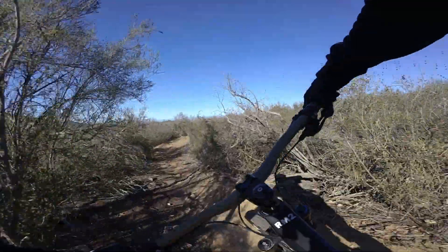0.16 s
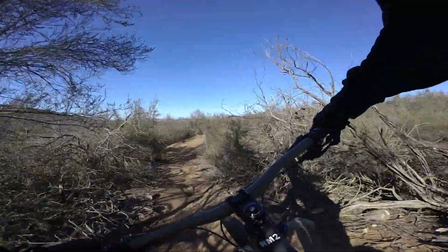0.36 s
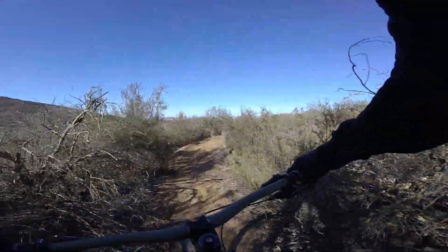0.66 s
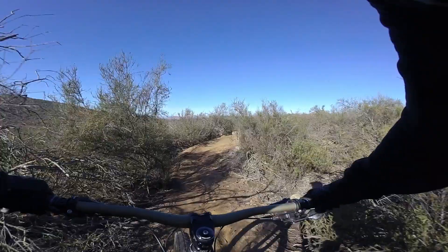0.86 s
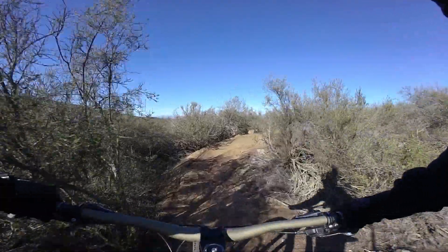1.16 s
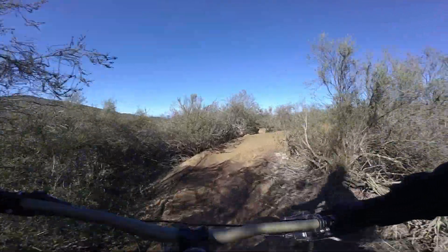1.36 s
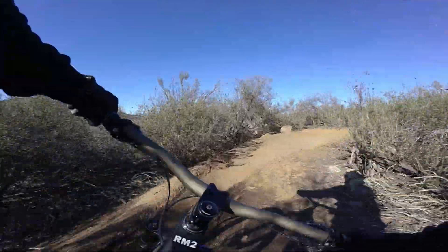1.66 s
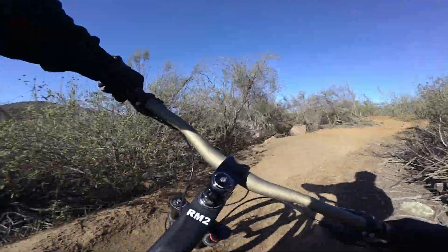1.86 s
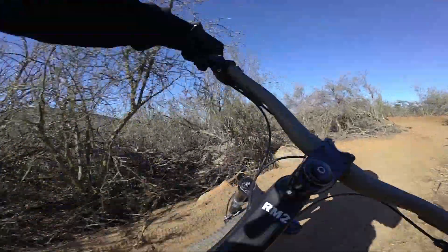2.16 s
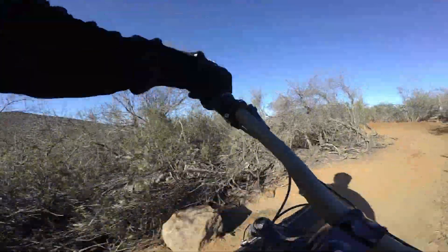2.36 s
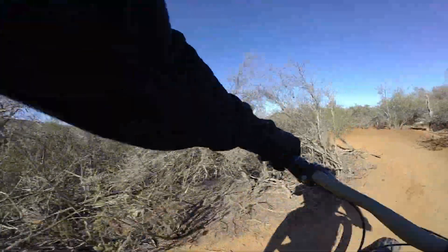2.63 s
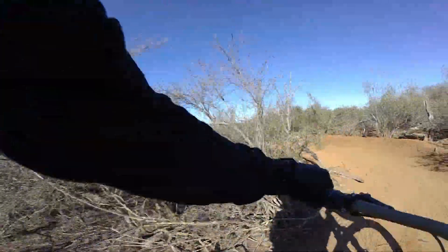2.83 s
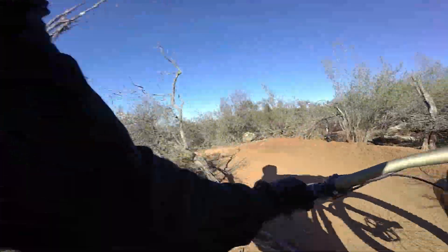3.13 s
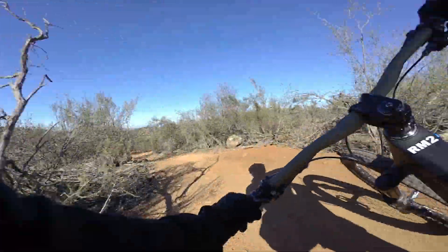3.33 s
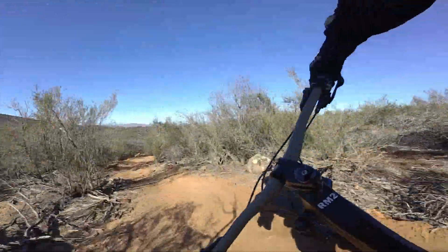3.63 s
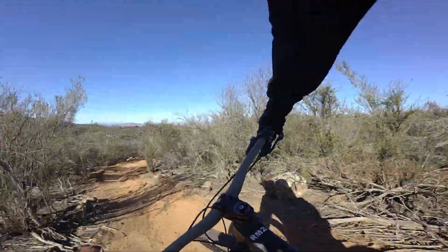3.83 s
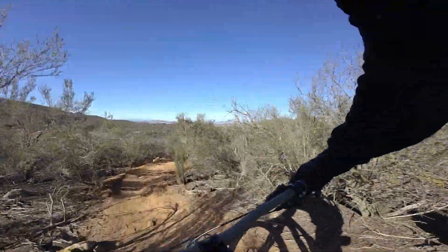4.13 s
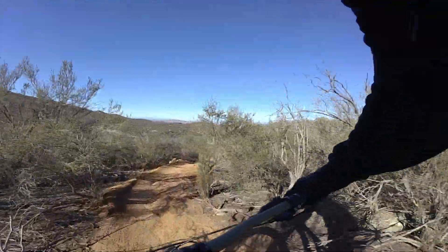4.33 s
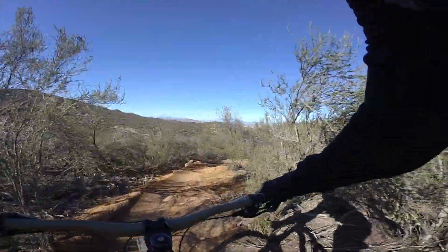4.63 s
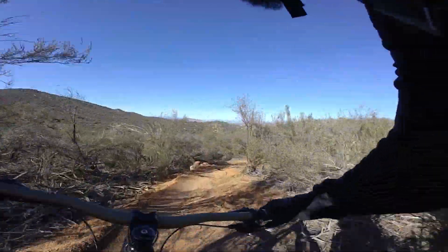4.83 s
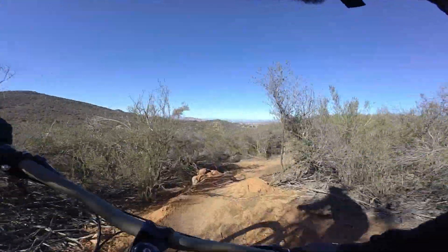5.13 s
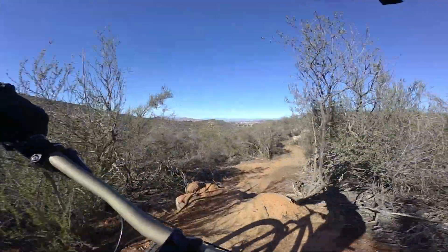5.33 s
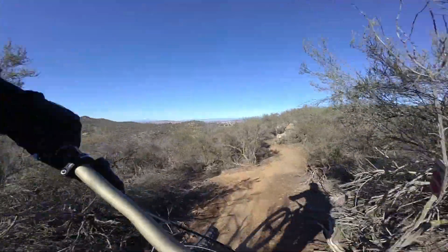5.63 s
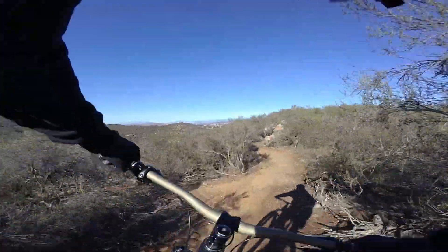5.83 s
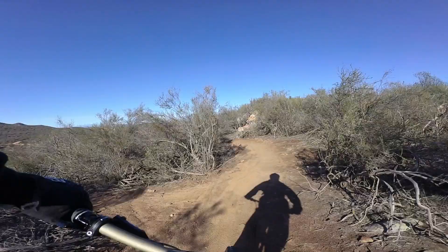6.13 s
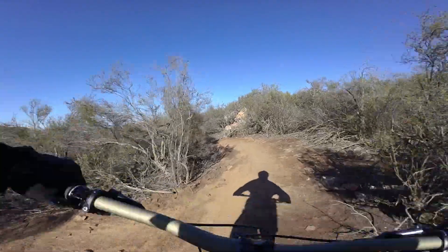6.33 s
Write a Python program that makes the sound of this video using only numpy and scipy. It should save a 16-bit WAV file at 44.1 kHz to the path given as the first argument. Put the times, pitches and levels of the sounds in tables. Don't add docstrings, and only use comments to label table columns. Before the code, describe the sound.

A mountain bike coasts on dirt and rock, heard by a small chest microphone in open air. Throughout, the tyres hum low and crunch grit while the freehub buzzes with uneven metallic clicks, roughly 50 to 115 teeth per second. From 0.2 to 1 s, wind flutters and thumps hard, with a pop near 0.5 and frame clacks near 0.8. Dry twigs hiss past at 1.0-1.25 s. Wind eases; from 1.45 to 2.45 s a faint blurred tread tone rises, then falls. The ratchet falls silent about 2.3-2.8 s during a pedal stroke, with chain rattle and small knocks, then resumes. From 3.3 to 4.9 s hard gusts, puffs and clipped pops mask the bike, strongest around 4 s. More blasts hit at 5.4-5.75 s as the tyres lighten. At 6.1 s they land with a boom, clattering frame and chain slaps, then coasting continues until 6.5 s.

```python
import sys
import numpy as np
from scipy import signal
from scipy.io import wavfile
from scipy.ndimage import uniform_filter1d

SR = 44100
rng = np.random.default_rng(int(sys.argv[2]) if len(sys.argv) > 2 else 0)


def transcribe(signal):
    frames = np.atleast_2d(signal).T
    limited = np.clip(frames, -1, 1)
    pcm = np.round(limited * 32767).astype(np.int16)
    wavfile.write(sys.argv[1], SR, pcm)


def volts_from_decibels(level):
    exponent = np.asarray(level, float) / 20
    return 10 ** exponent


N = 285768


def unit(x):
    return x / np.sqrt(np.mean(x ** 2) + 1e-20)


def in_time(rows):
    s, *columns = np.transpose(rows)
    return [np.interp(np.arange(N) / SR, s, c) for c in columns]


def band(x, lo_hz, hi_hz, order=2):
    limits = [lo_hz, min(hi_hz, .45 * SR)]
    return signal.sosfilt(signal.butter(order, limits, "band", fs=SR, output="sos"), x)


def drift(rate):
    r = np.exp(-20 * np.pi * rate / SR)
    slow = signal.lfilter([1], [1, -2 * r, r * r], rng.standard_normal(N // 10 + 4002))[4000:]
    return np.interp(np.arange(N) / 10, np.arange(len(slow)), unit(slow - slow.mean()))


def ring(x, hz, t60):
    r, w = volts_from_decibels(-60 / (t60 * SR)), 2 * np.pi * hz / SR
    return signal.lfilter([0, np.sin(w)], [1, -2 * r * np.cos(w), r * r], x + 1e-18)


def colour(x, spectrum, patchy_db):
    hz, level_db = np.transpose(spectrum)
    centres = 500 * 2 ** np.arange(0, 5.1, 1 / 3)
    bands_db = np.interp(np.log(centres), np.log(hz), level_db)
    total, sign = 0, 1
    for centre, db in zip(centres, bands_db):
        swell = volts_from_decibels(db + patchy_db * drift(6.7))
        total = total + swell * sign * band(x, centre / 1.12, centre * 1.12)
        sign = -sign
    return unit(total)


def bursts(rows, rise_db_s, sag_db, fall_db_s):
    start, length, level_db, value = np.transpose(rows)[:, :, None]
    t = np.arange(0, N + 20, 20) / SR
    done = np.clip((t - start) / length, 0, 1)
    early, late = np.maximum(start - t, 0), np.maximum(t - start - length, 0)
    shape = level_db - sag_db * done - rise_db_s * early - fall_db_s * late
    lead, steps = np.argmax(shape, axis=0), np.arange(len(t))
    columns = np.maximum(shape[lead, steps], -90), value[lead, 0], done[lead, steps]
    return [np.interp(np.arange(N) / SR, t, c) for c in columns]


def pushes(rows, swing):
    out = np.zeros(N)
    for s, peak_db, hz in rows:
        u = np.linspace(-3, 3, int(2 * SR / hz))
        push = volts_from_decibels(peak_db) * np.cos(swing * u) * np.exp(-u ** 2 / 2)
        i = int(s * SR)
        out[i:i + len(u)] += push[:N - i]
    return out


# time in seconds, peak in dB, pitch in Hz.
JOLTS = [(1.169, -27, 70.4), (1.399, -36, 70), (1.541, -21.5, 69.8), (2.263, -20.5, 68.5),
         (2.628, -18.5, 70.5), (2.709, -32, 70), (3.01, -32, 70), (5.987, -24, 73), (6.4, -22, 71)]


def bumps():
    return pushes(JOLTS, swing=1.66)


def mount_shake():
    start_db, t60 = -11, 0.34
    s, peak_db, _ = np.transpose(JOLTS)[:, :, None]
    since = np.arange(N) / SR - s
    return np.sum((since > 0) * volts_from_decibels(peak_db + start_db - 60 * np.abs(since) / t60), axis=0)


# time in seconds, level in dB.
HEADWIND_LEVEL = [(0.0, -34.5), (0.25, -19.5), (0.56, -31), (0.87, -24), (1.43, -38.5), (1.93, -61),
                  (2.83, -46), (3.32, -36.5), (3.45, -31), (3.54, -14.5), (3.62, -28.5), (4.15, -25),
                  (4.48, -29.5), (4.69, -20), (5.09, -33.5), (5.54, -16), (5.83, -36), (6.48, -36.5)]


def headwind():
    swings = unit(band(rng.standard_normal(N), 40, 129) * volts_from_decibels(2.64 * drift(4.6)))
    return (volts_from_decibels(in_time(HEADWIND_LEVEL)[0]) + mount_shake()) * swings


# start in seconds, length in seconds, level in dB, air speed in octaves above the mean.
GUST_ROWS = [(.18, .31, -11.5, 0.35), (.5, 0.033, -14, -0.15), (.56, 0.04, -11, 0.96),
             (.63, 0.094, -20, -0.079), (.72, 0.084, -17, 0.44), (.815, .045, -12, 0.55),
             (.865, .045, -18, 0.68), (.92, 0.03, -17, 0.42), (1.17, 0.041, -18, 0.42),
             (1.4, 0.031, -21.5, 0.32), (3.3, 0.15, -26, 0.028), (3.455, .02, -17, 0.19),
             (3.49, .15, -13, 0.73), (3.65, 0.088, -11, -.1), (3.78, 0.22, -14.5, 0.69),
             (3.98, .18, -11, 0.59), (4.175, 0.093, -14, 1.13), (4.26, .14, -15, 1.3),
             (4.42, 0.032, -24, -0.65), (4.5, .1, -18, 0.72), (4.6, .1, -14, -0.06),
             (4.68, .13, -11.5, 0.81), (4.865, 0.064, -13.5, 0.6), (5.21, 0.031, -22, 0.18),
             (5.25, 0.26, -26, -0.1), (5.51, 0.047, -18, -0.11), (5.592, .036, -4.5, 2.15),
             (5.686, 0.057, -10, 1.18), (6.074, .18, -27.5, .7), (6.39, 0.043, -23.5, -0.32)]


def gusts():
    level_db, octaves, done = bursts(GUST_ROWS, rise_db_s=1400, sag_db=1.5, fall_db_s=1100)
    mid_gust = np.sin(np.pi * done ** .7)
    octaves = uniform_filter1d(octaves - .5 * (1 - mid_gust), size=300)
    speed = 2 ** np.clip(octaves + .2 * drift(30.03), -.7, 2.5)
    street = unit(band(band(rng.standard_normal(6 * N), 99, 321), 92, 300, order=1))
    dragged = np.interp(np.cumsum(speed), np.arange(6 * N), street)
    large_eddies = volts_from_decibels(-2.5) * street[-N:] / np.maximum(speed, 1)
    flutter = (dragged + large_eddies) * volts_from_decibels(1.96 * drift(25.0))
    flutter = band(flutter, 151, 7400)
    flutter = flutter / (uniform_filter1d(flutter ** 2, size=3000) + .05) ** .3
    above_tyres = np.clip((level_db + 33) / 4, 0, 1)
    return volts_from_decibels(level_db - 3.5) * above_tyres * flutter


# time in seconds, peak in dB, pitch in Hz, length in seconds.
PUFF_ROWS = [(0.471, -11, 460, 0.046), (0.572, -32, 513, 0.015), (0.6, -39, 495, 0.023),
             (0.817, -31, 447, 0.02), (0.869, -28, 550, 0.019), (0.927, -26, 573, 0.023),
             (3.462, -11, 452, 0.0062), (3.534, -10, 522, 0.022), (3.965, -1.5, 460.2, 0.027),
             (4.182, -5, 670, 0.024), (4.226, -12, 598, 0.018), (4.293, -12, 520, 0.044),
             (4.329, -3, 540, 0.024), (4.372, -5.5, 448.8, 0.037), (4.513, -26, 463, 0.026),
             (4.731, -10.5, 570, 0.019), (4.864, -8.5, 489.3, 0.031), (5.229, -16, 501.8, 0.026),
             (5.418, -4.5, 465.2, 0.015), (5.467, -12, 481, 0.021), (5.526, -12.5, 600, 0.028),
             (5.721, -28, 522, 0.025)]


def puffs():
    out, size = np.zeros(N), 3000
    for (s, peak_db, hz, length), noise in zip(PUFF_ROWS, rng.standard_normal((len(PUFF_ROWS), size))):
        u = np.clip(np.arange(size) / SR / length, 0, 1)
        jet = band(noise, 0.53 * hz, 1.21 * hz) * np.sin(np.pi * u ** 0.3)
        i = int((s - .002) * SR)
        out[i:i + size] += volts_from_decibels(peak_db - 5.0) * jet / np.abs(jet).max()
    return out


# time in seconds, peak in dB, pitch in Hz.
EDDY_POPS = [(0.511, -5.5, 242), (4.003, 1, 253), (4.042, -0.5, 241.9), (4.143, -6, 238.6),
             (5.468, -11, 252.4), (5.693, 2, 245)]


def pops():
    return pushes(EDDY_POPS, swing=2.13)


# time in seconds, level in dB.
TWIGS = [
    (.95, -63),
    (1.03, -42),
    (1.09, -32),
    (1.15, -35),
    (1.22, -43),
    (1.3, -67),
]


def swish():
    hiss = unit(band(rng.standard_normal(N), 4740, 6630) * volts_from_decibels(2.0 * drift(40)))
    return volts_from_decibels(in_time(TWIGS)[0]) * hiss


# time in seconds, pitch in Hz, level in dB.
KNOB_SONG = [
    (1.449, 350, -63),
    (1.6, 402, -38.5),
    (1.799, 432, -39.5),
    (2.001, 440, -36),
    (2.15, 415, -37.5),
    (2.301, 369.5, -37),
    (2.45, 325, -45),
]


def knobs():
    first, last = KNOB_SONG[0], KNOB_SONG[-1]
    fade_in, fade_out = (first[0] - .1, first[1], -70), (last[0] + 0.08, last[1], -70)
    hz, level_db = in_time([fade_in] + list(KNOB_SONG) + [fade_out])
    turn = 2 * np.pi * np.cumsum(hz) / SR
    return volts_from_decibels(level_db - 0.5) * unit(drift(28) * np.cos(turn) + drift(32) * np.sin(turn))


# time in seconds, grit level in dB.
GRIT_LEVEL = [(0.0, -34.5), (0.41, -46), (0.7, -48), (0.92, -40), (1.62, -41), (2.2, -35), (2.45, -44),
              (3.07, -41.5), (3.27, -36), (3.5, -40), (4.3, -50), (4.62, -39), (4.78, -45.5), (5.14, -40),
              (5.52, -34.5), (5.74, -48), (6.12, -46), (6.3, -39.5)]
# pitch in Hz, width in Hz, level in dB.
CASING_HUMS = [(108, 19, -9.5), (158.4, 5, -1.5), (258, 22, -2.5), (297, 79, 0.5), (350, 45, -6),
               (440, 320, -9), (613.5, 22, -11), (810, 36, -50)]
# pitch in Hz, level in dB per Hz.
GRIT_TONE = [(500, -25), (800, -4), (1050, -12), (1300, -3.5), (1900, -2), (2500, -2.5), (4000, -7),
             (7000, -15.5), (15000, -47)]


def tyres():
    grit_db, = in_time(GRIT_LEVEL)
    off, on = 5.45, 6.065
    load_db, = in_time([(off - .15, 0), (off, -10.5), (on, -10.5), (on + 0.014, 12.5), (on + 0.28, 0)])
    hum_db = -36 + 0.67 * (grit_db + 40) + load_db
    road = rng.standard_normal(N) * volts_from_decibels(1.44 * drift(14))
    hum = 0
    for hz, width, level_db in CASING_HUMS:
        tone = unit(ring(road, hz, 4.4 / width)) / np.sqrt(40 / width)
        hum = hum + volts_from_decibels(level_db + 1.9 * drift(1.9)) * tone
    sizes = volts_from_decibels(3.5 * np.minimum(rng.exponential(1, N), 5)) * rng.choice([-1, 1], N)
    grains = sizes * (rng.random(N) < 8000 * volts_from_decibels(3 * drift(15)) / SR)
    crunch = colour(grains, GRIT_TONE, patchy_db=2.5)
    return volts_from_decibels(np.minimum(hum_db, -26) + 1.5) * unit(hum) + volts_from_decibels(grit_db + 1.5) * crunch


# start in seconds, length in seconds, level in dB, treble against it in dB.
CHAIN_RATTLES = [
    (2.542, 0.13, -31.5, -36),
    (2.744, 0.0045, -36, -21),
    (6.078, 0.0043, -18.5, -21),
    (6.098, .012, -16.5, -11),
    (6.11, .045, -26, -9),
    (6.155, .1, -26.5, -28),
]


def chain():
    level_db, treble_db, _ = bursts(CHAIN_RATTLES, rise_db_s=2500, sag_db=6, fall_db_s=700)
    sizes = volts_from_decibels(2.8 * rng.exponential(1, N)) * rng.choice([-1, 1], N)
    ticks = sizes * (rng.random(N) < 2500 / SR)
    bright = unit(band(band(ticks, 4000, 10000), 2500, 9000))
    links = unit(band(ticks, 1400, 3800)) + volts_from_decibels(treble_db) * bright
    return volts_from_decibels(level_db - 4.0) * links


# time in seconds, peak in dB, ring in Hz, treble against it in dB.
KNOCKS = [(0.0716, -19.5, 2750, -8), (0.504, -24.5, 2720, -22), (0.7445, -32, 2760, -9),
          (0.824, -14.5, 3200, -4.5), (0.8363, -14.5, 1940, -25), (1.0355, -20.5, 2140, -12),
          (1.0891, -17, 2174, -15), (1.1367, -20, 2168, -16), (1.5484, -17, 2860, -12),
          (1.8724, -33, 2800, -15), (2.065, -20, 2770, -12), (2.5441, -25, 2140, -28),
          (2.6148, -28, 1680, -13), (2.6578, -18.5, 2700, -37), (4.4521, -24, 2094, -27),
          (4.5182, -20, 1920, -20), (5.5093, -13, 1820, -7), (6.0763, -22, 2830, -28),
          (6.1013, -18, 1982, 7), (6.146, -18, 2117, 2.5), (6.182, -18, 2760, -24),
          (6.2134, -11.5, 1380, -32), (6.222, -13, 1290, -23), (6.234, -17, 2790, -23),
          (6.376, -28.5, 2090, -22), (6.3866, -15, 2086, -29)]


def clacks():
    out, size = np.zeros(N), 4000
    for (s, peak_db, hz, treble_db), noise in zip(KNOCKS, rng.standard_normal((len(KNOCKS), size))):
        burst = noise * volts_from_decibels(-60 * np.arange(size) / SR / 0.024)
        body = unit(ring(burst, hz, 0.044)) + 1.43 * unit(band(burst, 0.74 * hz, 1.3 * hz))
        crack = band(band(burst, 4000, 10000), 2500, 9000)
        knock = body / np.abs(body).max() + volts_from_decibels(treble_db) * crack / np.abs(crack).max()
        i = int(s * SR)
        out[i:i + size] += volts_from_decibels(peak_db - 2.0) * knock[:N - i]
    return out


PEDAL_STROKE = (2.27, 2.78)
LAST_TEETH = [2.284, 2.302, 2.327, 2.368, 2.773]


def tooth_times(rate):
    count = np.cumsum(rate) / SR
    s = np.interp(np.arange(1, count[-1]), count, np.arange(N) / SR)
    coasting = (s < PEDAL_STROKE[0]) | (s > PEDAL_STROKE[1])
    return np.concatenate([s[coasting], LAST_TEETH])


SHELL_HZ = [2765, 2815, 3090, 3400, 3600, 3930, 4260, 5040, 5910, 5975, 6500, 6900, 7710, 8890, 9730, 10490,
            11500, 12200, 14050]
# level in dB, time to fall 60 dB in seconds.
SHELL_RING = [(2, 0.044), (-4, 0.044), (-14.5, 0.053), (2, 0.028), (0.5, 0.017), (1, 0.015), (-1.5, 0.012),
              (-4, 0.0061), (-7, 0.029), (-13, 0.021), (-18, 0.036), (-17.5, 0.014), (-23, .015),
              (-19.5, 0.021), (-22, 0.024), (-28.5, 0.024), (-27.5, .01), (-21.5, .008), (-32, 0.0089)]


def shell_ring(at, strength_db):
    shell = 0
    for hz, (level_db, t60) in zip(SHELL_HZ, SHELL_RING):
        clicks = np.zeros(N)
        facing_db = 1.8 * drift(7)[at] + 2.0 * rng.standard_normal(len(at))
        clicks[at] = volts_from_decibels(level_db + strength_db + facing_db) * rng.choice([-1, 1], len(at))
        shell = shell + band(ring(clicks, hz, t60), .8 * hz, 1.2 * hz, order=1)
    flex_s = .00004 * drift(25)
    return np.interp(np.arange(N) - flex_s * SR, np.arange(N), shell)


# pitch in Hz, level in dB per Hz.
SNAP_TONE = [(1290, -52), (2200, -42.5), (2800, -19), (2960, 11.5), (3480, 1), (7640, -20.5), (10100, -21),
             (15000, -33)]


def pawl_snap(at, strength_db):
    drops = np.zeros(N)
    drops[at] = volts_from_decibels(strength_db)
    fade = signal.lfilter([1], [1, -volts_from_decibels(-60 / (0.05 * SR))], drops)
    tail = signal.lfilter([1], [1, -volts_from_decibels(-60 / (.15 * SR))], drops)
    return colour((unit(fade) + 0.72 * unit(tail)) * rng.standard_normal(N), SNAP_TONE, patchy_db=1.8)


# time in seconds, ratchet teeth per second.
RATCHET_SPEED = [(0.0, 98), (.26, 116), (.46, 82), (.77, 74), (1.08, 78), (1.38, 114), (1.59, 85),
                 (1.8, 100), (2.26, 78), (2.78, 101), (3.05, 85), (3.4, 88), (3.65, 110), (3.92, 47),
                 (4.25, 60), (4.85, 63), (5.5, 77), (6.48, 76)]
PAWL_LEVELS = [-4, -10.5, -14, -5.5]
# time in seconds, level in dB.
HUB_LEVEL = [(0.0, -38.5), (0.16, -36), (0.38, -43.5), (0.58, -47.5), (0.78, -40), (1.48, -39.5),
             (1.73, -37), (2.18, -35.5), (2.6, -43), (3.07, -38), (3.5, -38), (3.9, -38.5), (4.26, -49),
             (4.67, -42.5), (5.36, -40), (5.87, -40.5), (6.32, -39.5), (6.48, -41)]


def freehub():
    rate, = in_time(RATCHET_SPEED)
    times = tooth_times(rate)
    late = .0038 * np.sort(rng.random((len(times), 4)) ** 1.5)
    late = late + .0003 * rng.standard_normal((len(times), 1))
    at = np.clip(((times[:, None] + late) * SR).astype(int), 0, N - 1).ravel()
    strength_db = (rng.normal(0, 1.2, (len(times), 1)) + PAWL_LEVELS).ravel()
    sound = unit(shell_ring(at, strength_db)) + volts_from_decibels(-4.5) * pawl_snap(at, strength_db)
    echo_s = 0.00158 + 0.000185 * drift(0.96)
    sound = sound + 0.3 * np.interp(np.arange(N) - echo_s * SR, np.arange(N), sound)
    level_db, = in_time(HUB_LEVEL)
    treble_db = -9 + 1 * np.log2(rate / 80)
    treble_gain = volts_from_decibels(np.clip(treble_db + 17.5, -30, 12))
    sound = sound + band(sound, 6420, 23700) * (treble_gain - 1)
    return volts_from_decibels(np.minimum(level_db, -33) + 1.5) * sound


def scene():
    air = headwind() + gusts() + puffs() + bumps() + pops()
    bike = tyres() + knobs() + chain() + clacks() + freehub()
    return (air + swish() + bike)[None]


def band_limit(x):
    return signal.sosfilt(signal.butter(12, 15730, fs=SR, output="sos"), x)


def record(dry):
    no_bass = signal.sosfilt(signal.butter(2, 32, "high", fs=SR, output="sos"), dry)
    ceiling = np.clip(no_bass, -.99, .99)
    mix = signal.sosfilt(signal.cheby2(12, 60, 15800, fs=SR, output="sos"), ceiling)
    return band_limit(mix)


dry = scene()
out = record(dry)
transcribe(out)
```